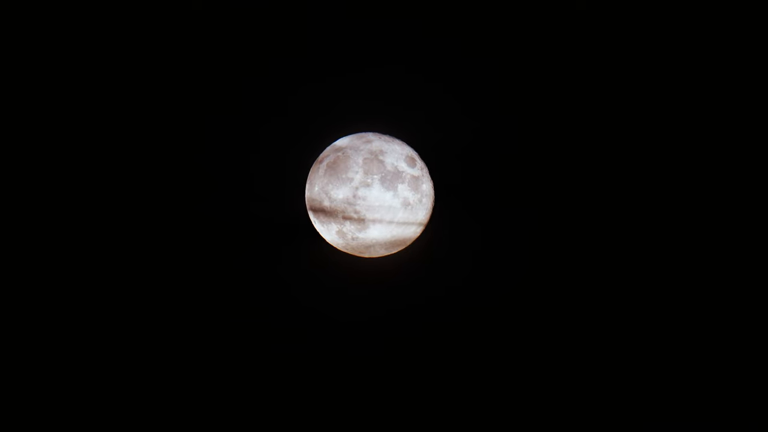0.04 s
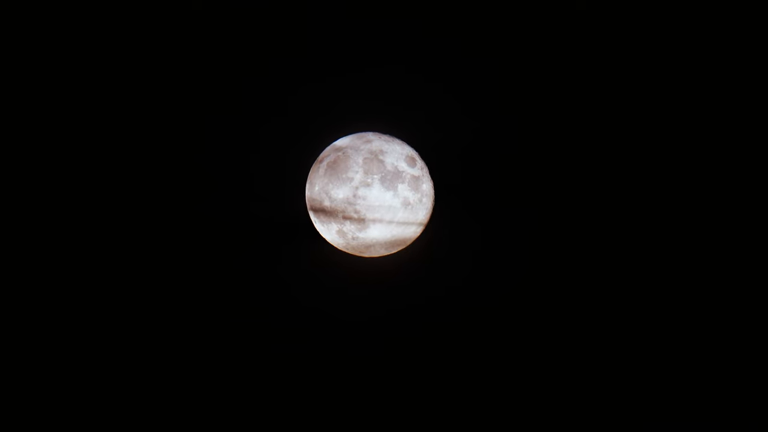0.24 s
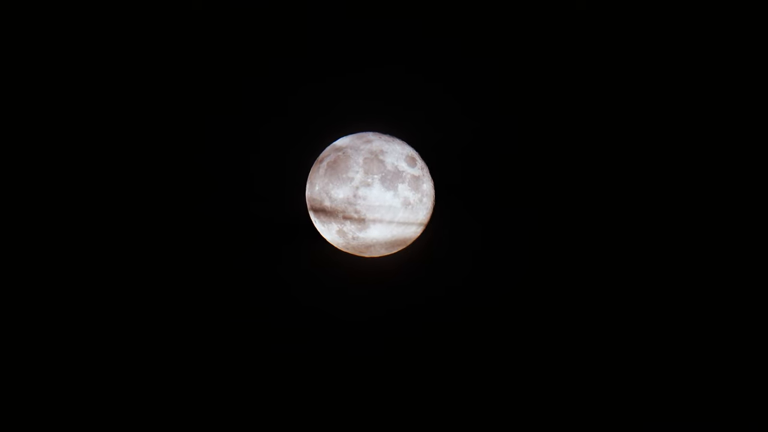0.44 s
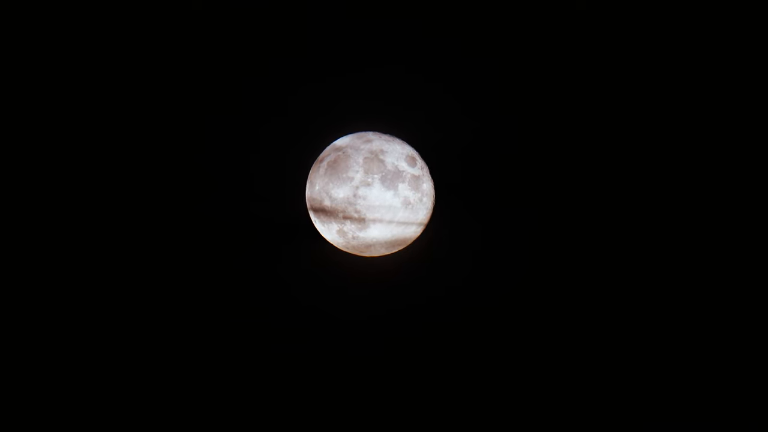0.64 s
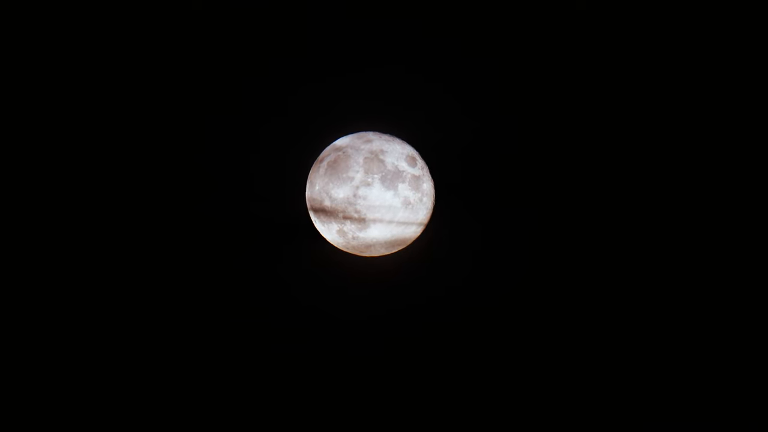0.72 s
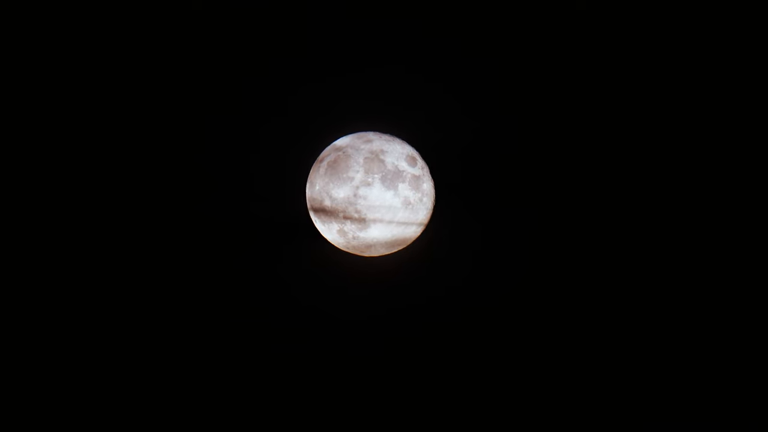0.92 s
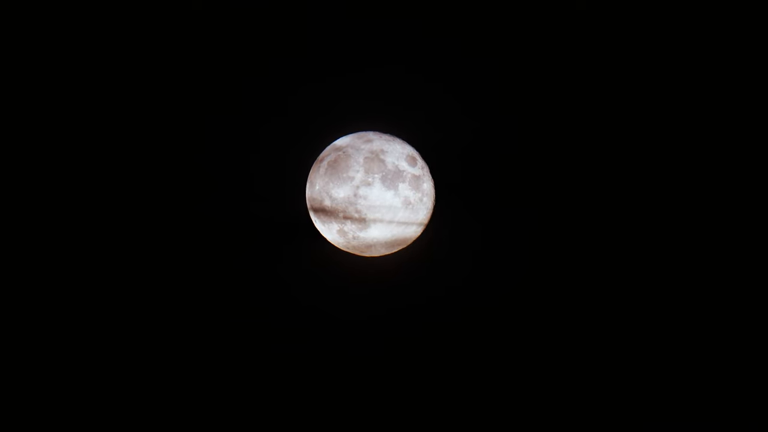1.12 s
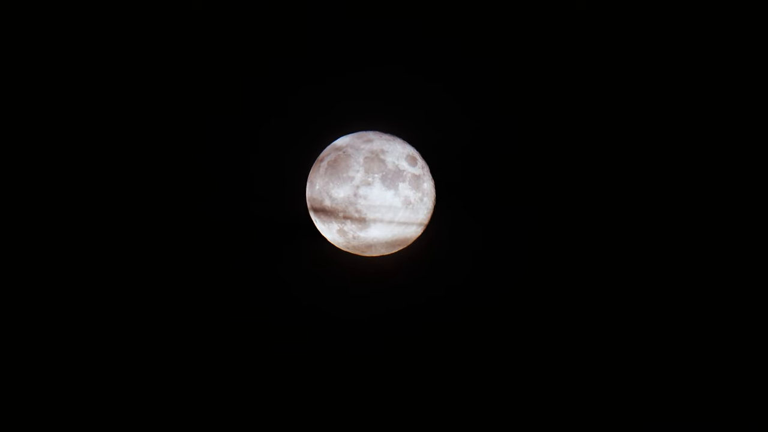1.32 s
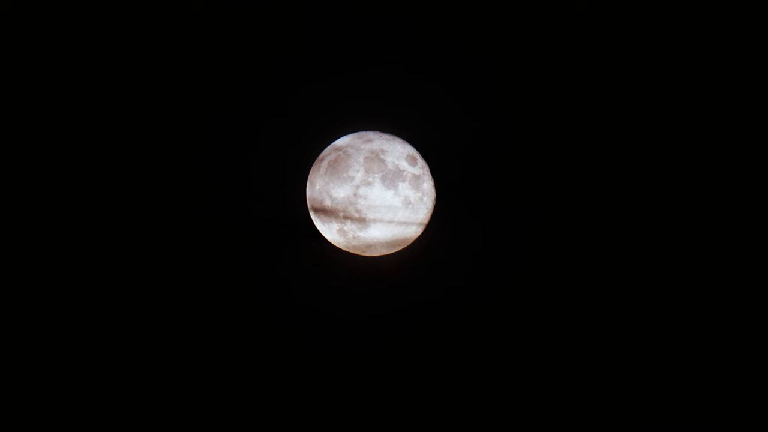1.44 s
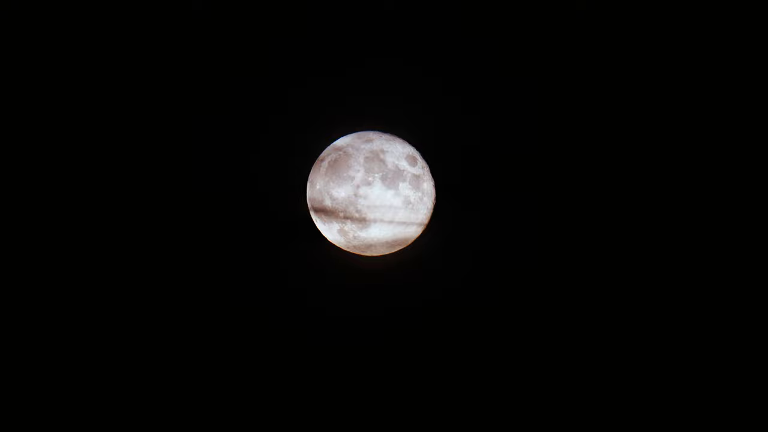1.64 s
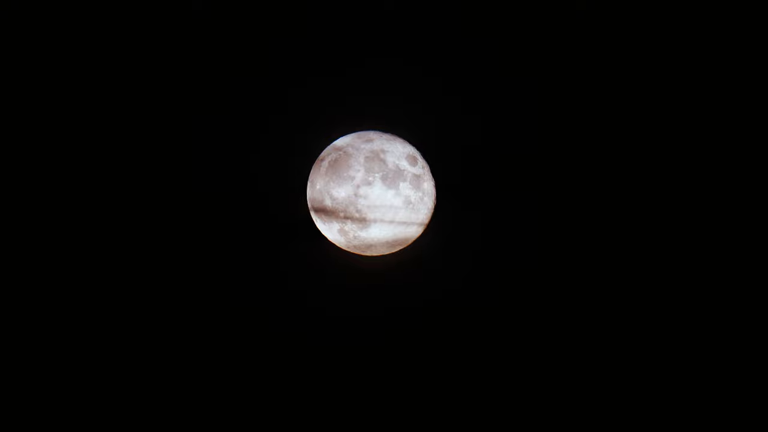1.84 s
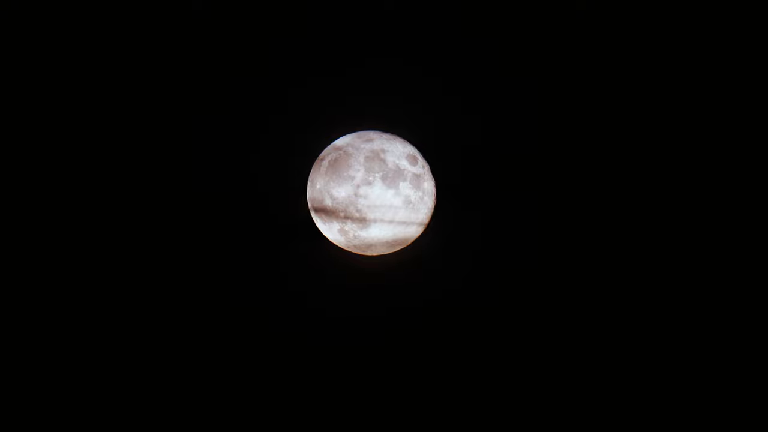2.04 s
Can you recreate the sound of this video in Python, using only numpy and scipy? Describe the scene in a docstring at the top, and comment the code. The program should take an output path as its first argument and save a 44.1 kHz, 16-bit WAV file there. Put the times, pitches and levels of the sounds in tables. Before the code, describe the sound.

An owl gives one short, smooth hoot close by, with a faint dull echo from trees; insects chirr softly and stop together, then a few thin distant chirps sound over steady night hiss.

```python
"""Owl hoot on an insect night

An owl gives one arched, almost pure hoot with faint overtones and a little air; trees return a soft, dull echo.
Insects chirr as a band of narrow noise tones with a buzz and a rasp, and stop together.
A few thin distant chirps follow, made of gliding sine tones.
Under it all lie a soft hiss of shaped noise, a high sizzle that grows late, and a faint mains hum.
"""
import sys
import numpy as np
from scipy import signal
from scipy.fft import rfft, irfft
from scipy.io import wavfile
from scipy.ndimage import uniform_filter1d

SR = 44100
rng = np.random.default_rng(int(sys.argv[2]) if len(sys.argv) > 2 else 0)


def waveform_to_disk(signal):
    """Save audio, clipped to [-1, 1], as 16-bit WAV at the path in sys.argv[1]."""
    frames = np.transpose(np.atleast_2d(signal))
    scaled = np.clip(frames, -1, 1) * 32767
    samples = np.round(scaled).astype(np.int16)
    wavfile.write(sys.argv[1], SR, samples)


N = 92610  # length of the scene in samples (2.1 s)


def undb(db):
    """Turn decibels into a plain amplitude factor."""
    return 10 ** (np.asarray(db) / 20)


def unit(x):
    """Scale to rms 1."""
    return x / np.sqrt(np.mean(x ** 2))


def curve(rows, axis=1):
    """One column of a time table, joined by straight lines."""
    rows = np.array(rows, float)
    return np.interp(np.arange(N) / SR, rows[:, 0], rows[:, axis])


def noise(points):
    """Noise of rms 1 with the given (Hz, dB) colour."""
    hz, db = np.array(points, float).T
    f = np.maximum(np.fft.rfftfreq(N, 1 / SR), 1)
    # straight lines between the points on a logarithmic frequency scale
    colour = undb(np.interp(np.log(f), np.log(hz), db))
    return unit(irfft(rfft(rng.standard_normal(N)) * colour, N))


def narrow(hz, width_hz):
    """Noise of rms 1 in one narrow resonance; at 0 Hz it is a slow random wander."""
    f = np.fft.rfftfreq(N, 1 / SR)
    resonance = 1 / (1 + ((f - hz) / width_hz) ** 2)
    return unit(irfft(rfft(rng.standard_normal(N)) * resonance, N))


def scatter(x, t60_s, build_up_s):
    """Diffuse tail from many trunks and leaves: noise that builds up, then falls by 60 dB in t60_s."""
    t = np.arange(N) / SR
    build_up = 1 - np.exp(-(t / build_up_s) ** 2)
    decay = np.exp(-np.log(1000) * t / t60_s)
    tail = rng.standard_normal(N) * decay * build_up
    return signal.fftconvolve(x, tail / np.sqrt(np.sum(tail ** 2)))[:N]


def background():
    """Smooth hiss, a high sizzle that grows late, and mains hum as a single low sine."""
    # Colour of the night hiss. Each row: frequency in Hz, relative level in dB per Hz.
    hiss_colour = [(25, -41.5), (70, -32), (120, -36.5), (170, -25), (220, -16), (290, -4.5), (430, 2.5),
                   (600, -0.5), (850, -7), (1200, -11.5), (1700, -17), (2400, -20.5), (3300, -25),
                   (4500, -32), (6000, -36), (8000, -40.5), (11000, -38.5), (15500, -37)]
    # Colour of the high sizzle. Each row: frequency in Hz, relative level in dB per Hz.
    sizzle_colour = [(2500, -21.5), (3600, 4.5), (5200, 1.5), (6200, -9), (8000, -21)]
    # Loudness of the sizzle. Each row: time in seconds, level in dB.
    sizzle_level = [(0, -74.5), (1.6, -72.5), (1.9, -67.5), (2.1, -63.5)]
    hiss_db, hum_db, hum_hz = -44, -72.5, 50
    t = np.arange(N) / SR
    hiss = undb(hiss_db) * noise(hiss_colour)
    sizzle = undb(curve(sizzle_level)) * noise(sizzle_colour)
    hum = np.sqrt(2) * undb(hum_db) * np.sin(2 * np.pi * hum_hz * t)
    return hiss + sizzle + hum


def insects():
    """Narrow beating tones in a soft buzz, with a rasp near 4 kHz; all stop together."""
    # Insect tones, lower and upper group. Each row: frequency in Hz, level in dB before the chirring curve.
    low_tones = [(1868, -64), (1950, -65.5), (1977, -64), (2045, -75.5)]
    high_tones = [(2152, -64), (2188, -65.5), (2286, -62), (2341, -61), (2461, -65), (2533, -70.5),
                  (2665, -67.5)]
    # How the chirring swells. Each row: time in seconds, then changes in dB for the lower tones,
    # for the upper tones and buzz, and for the rasp.
    chirr = [(0, -18, -1, -7.5), (.2, 3.5, -3, -5.5), (.35, 3.5, 0, -4), (.55, 3, 1, 1.5), (.66, 4, 1, 0.5),
             (.8, 0, 2, 2.5), (.92, 5.5, 3, 1), (1.01, -5, 2.5, 0), (1.07, -3, 2, 0.5), (1.14, 4, 3.5, 1),
             (1.26, -0.5, 0.5, -2.5)]
    # Colours of the noisy buzz and rasp. Each row: frequency in Hz, relative level in dB per Hz.
    buzz_colour = [(1600, -24), (1900, 4), (2300, -2.5), (2650, -3.5), (3000, -10), (3500, -17.5),
                   (4200, -38.5)]
    rasp_colour = [(2700, -21.5), (3200, -5.5), (3550, -2), (3850, 6), (4150, 4), (4350, -1.5),
                   (4600, -5.5), (4900, -10), (5600, -36)]
    tone_width_hz = 12.4
    buzz_db, rasp_db = -57, -63  # before the chirring curve
    end_s, fade_s = 1.321, 0.05
    t = np.arange(N) / SR
    low = sum(undb(db) * narrow(hz, tone_width_hz) for hz, db in low_tones)
    high = sum(undb(db) * narrow(hz, tone_width_hz) for hz, db in high_tones)
    buzz = undb(buzz_db) * noise(buzz_colour)
    lower_part = low * undb(curve(chirr, axis=1))
    upper_part = (high + buzz) * undb(curve(chirr, axis=2))
    rasp = noise(rasp_colour) * undb(rasp_db + curve(chirr, axis=3))
    fade_out = np.clip((end_s - t) / fade_s, 0, 1)
    return (lower_part + upper_part + rasp) * fade_out


def owl():
    """A clean tone on an arch of pitch; weak overtones and a little air brighten it towards the end."""
    # The hoot. Each row: time in seconds, pitch in Hz, level in dB.
    arch = [(.197, 310, -44.5), (.21, 354.5, -23), (.222, 391, -16.5), (.238, 414.5, -11),
            (.265, 431.6, -9), (.3, 443.1, -8), (.345, 443.6, -8.5), (.39, 438.5, -10.5),
            (.435, 428.3, -12), (.48, 414.6, -15.5), (.515, 394, -19.5), (.54, 365.3, -25),
            (.565, 315.7, -37.5)]
    # Overtones. Each row: multiple of the pitch, level in dB before the swell and flicker.
    overtones = [(2, -46), (3, -42.5), (4, -53), (5, -64.5), (6, -70.5), (7, -60), (8, -63), (9, -65.5),
                 (10, -73), (11, -76.5), (12, -78), (13, -80), (14, -80), (16, -82)]
    # Swell of all overtones. Each row: time in seconds, change in dB.
    overtone_swell = [(.2, -9.5), (.225, -1), (.26, 0.5), (.33, -1), (.42, -0.5), (.48, 2.5), (.52, 0),
                      (.565, -6.5)]
    # Thin whistles where an overtone swells; any outside the hoot stay silent.
    # Each row: time of the peak in seconds, width in seconds, multiple of the pitch, peak level in dB.
    whistles = [(0.357, 0.022, 14, -66.5), (.48, .033, 13, -64.5), (0.49, .035, 11, -66.5),
                (0.76, .022, 12, -67), (.42, 0.023, 9, -63.5)]
    # Colour of the airy rush. Each row: frequency in Hz, relative level in dB per Hz.
    air_colour = [(1500, -22.5), (2800, -1.5), (3900, -1), (4700, -12), (6500, -22), (9000, -34)]
    attack_s, release_s = 0.007, 0.0093
    air_db, air_peak_s, air_width_s = -58, .43, 0.065
    t = np.arange(N) / SR
    start, end = arch[0][0], arch[-1][0]
    # rounding off the corners of the curves; sizes in samples
    hz = uniform_filter1d(curve(arch, axis=1), size=500)
    db = uniform_filter1d(curve(arch, axis=2), size=300)
    # fade in just before the start and out just after the end
    fade = np.minimum((t - start) / attack_s, (end - t) / release_s) + 1
    gate = np.sin(np.pi / 2 * np.clip(fade, 0, 1)) ** 2
    wavering_hz = hz * (1 + 0.0013 * narrow(0, 73))
    phase = 2 * np.pi * np.cumsum(wavering_hz) / SR
    pure = undb(db) * np.sin(phase)
    # each overtone flickers by about 1.5 dB
    upper = sum(undb(d + 1.5 * narrow(0, 19)) * np.sin(round(k) * phase) for k, d in overtones)
    upper = undb(curve(overtone_swell)) * upper
    thin = sum(undb(d) * np.exp(-((t - s) / w) ** 2) * np.sin(round(k) * phase) for s, w, k, d in whistles)
    air = undb(air_db) * np.exp(-((t - air_peak_s) / air_width_s) ** 2) * noise(air_colour)
    return np.sqrt(2) * gate * (pure + upper + thin) + air


def trees(x):
    """A late copy and a faint diffuse tail, both dulled because the treble is filtered away."""
    # Echo from the trees. Each row: delay in seconds, level in dB.
    echo_rows = [(.29, -31)]
    top_hz = 1500
    tail_db, tail_t60_s, tail_build_up_s = -37, 2.2, 0.057
    t = np.arange(N) / SR
    dull = signal.sosfilt(signal.butter(2, top_hz, fs=SR, output="sos"), x)
    echoes = sum(undb(db) * np.interp(t - s, t, dull, left=0) for s, db in echo_rows)
    return echoes + undb(tail_db) * scatter(dull, tail_t60_s, tail_build_up_s)


def chirps():
    """Thin gliding whistles, smeared by distance."""
    # Distant chirps. Each row: start in seconds, length in seconds, start pitch in Hz, end pitch in Hz,
    # peak level in dB.
    chirp_rows = [(1.485, 0.063, 4056, 3930, -61), (1.526, .04, 4010, 3730, -58.5),
                  (1.56, 0.056, 3650, 3690, -67), (1.666, 0.085, 4030, 4280, -63.5),
                  (1.722, 0.045, 4420, 4670, -60), (1.745, 0.097, 4670, 4650, -68.5),
                  (1.863, 0.13, 3970, 4070, -70)]
    waver = 0.00568  # typical random pitch change, as a fraction of the pitch
    tail_db, tail_t60_s, tail_build_up_s = -9, .25, 0.0092
    t = np.arange(N) / SR
    out = 0
    for start, length, from_hz, to_hz, db in chirp_rows:
        progress = np.clip((t - start) / length, 0, 1)
        glide_hz = from_hz + (to_hz - from_hz) * np.sin(np.pi * progress / 2) ** 2
        hz = glide_hz * (1 + waver * narrow(0, 77))
        swell = np.sin(np.pi * progress)
        out = out + np.sqrt(2) * undb(db) * swell * np.sin(2 * np.pi * np.cumsum(hz) / SR)
    return out + undb(tail_db) * scatter(out, tail_t60_s, tail_build_up_s)


def scene():
    """The owl close by, its echo, and the night around it."""
    hoot = owl()
    return (background() + insects() + hoot + trees(hoot) + chirps())[None]


def record(dry):
    """The recorder cuts the top: a steep low-pass filter at 15750 Hz."""
    return signal.sosfilt(signal.ellip(10, .1, 80, 15750, fs=SR, output="sos"), dry)


dry = scene()
out = record(dry)
waveform_to_disk(out)
```